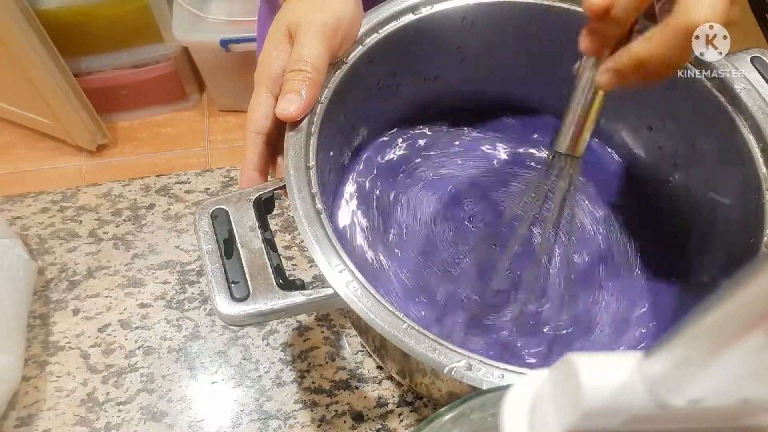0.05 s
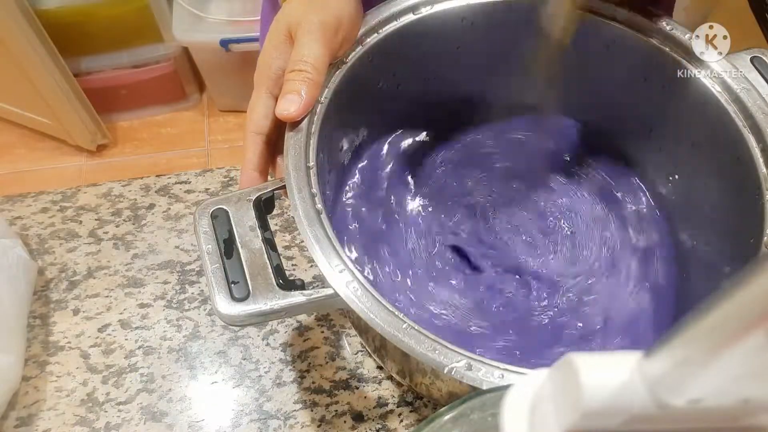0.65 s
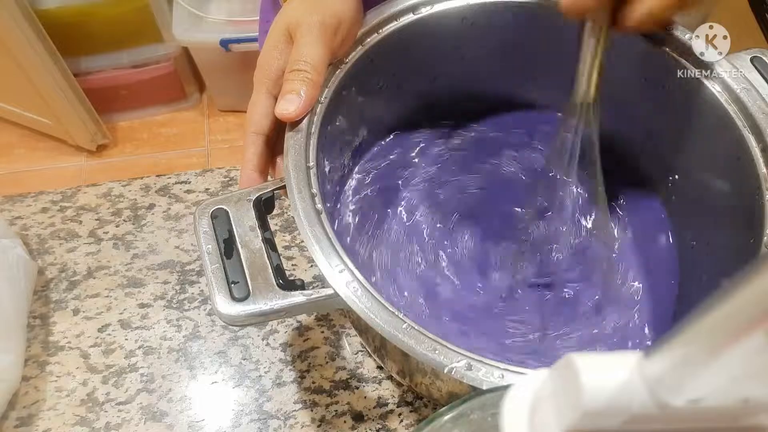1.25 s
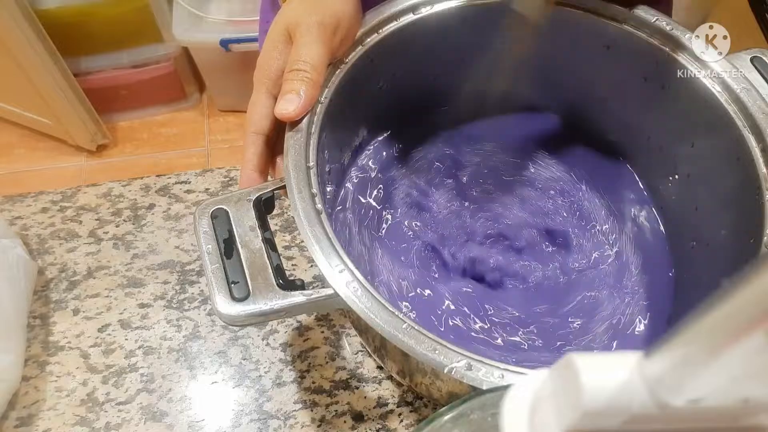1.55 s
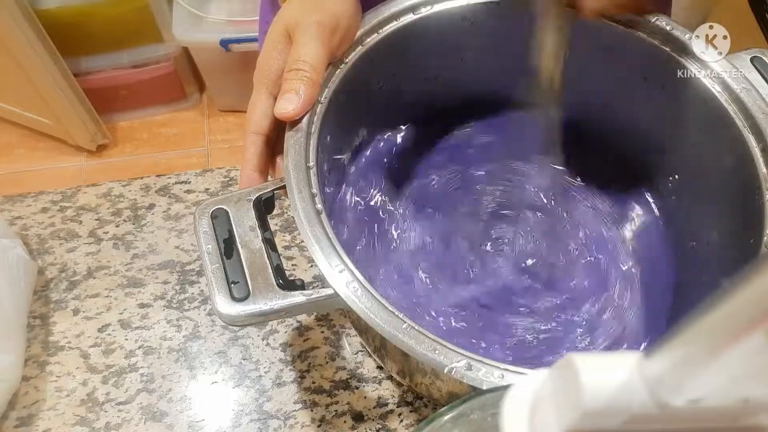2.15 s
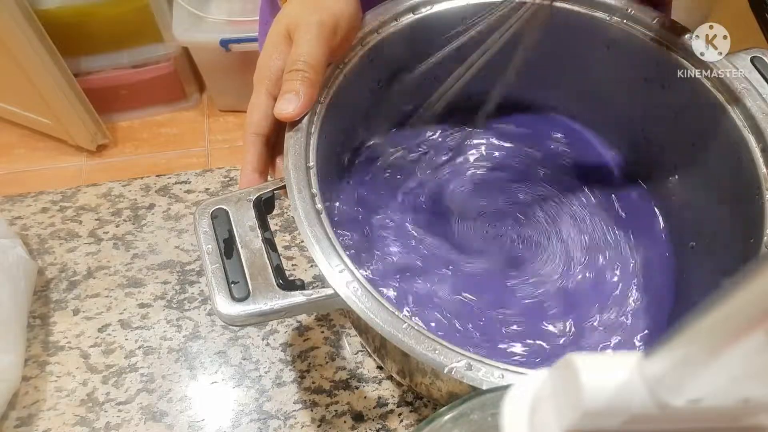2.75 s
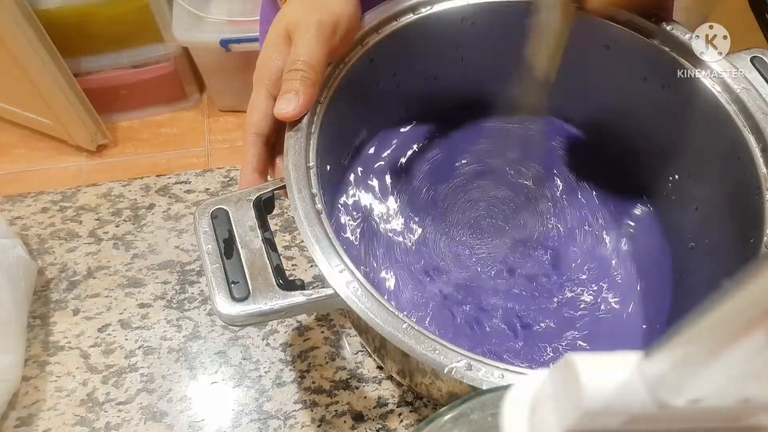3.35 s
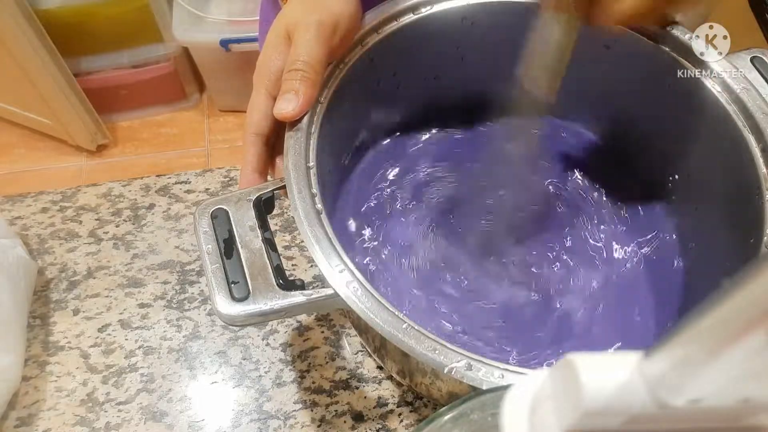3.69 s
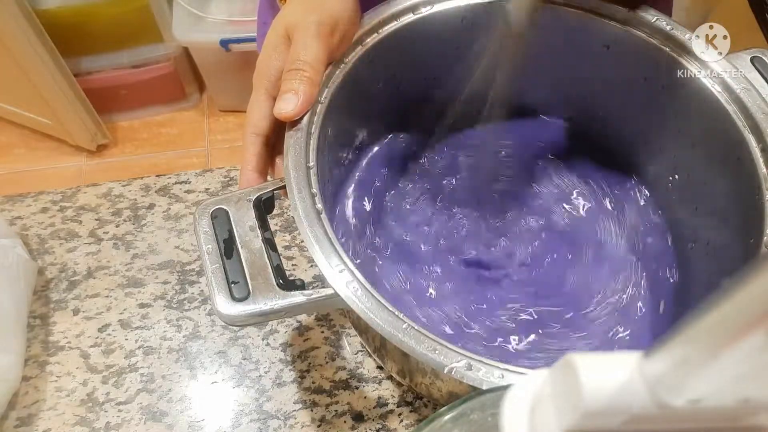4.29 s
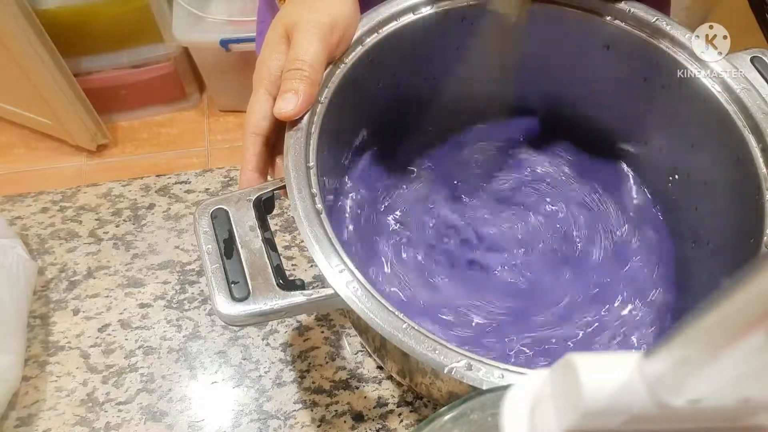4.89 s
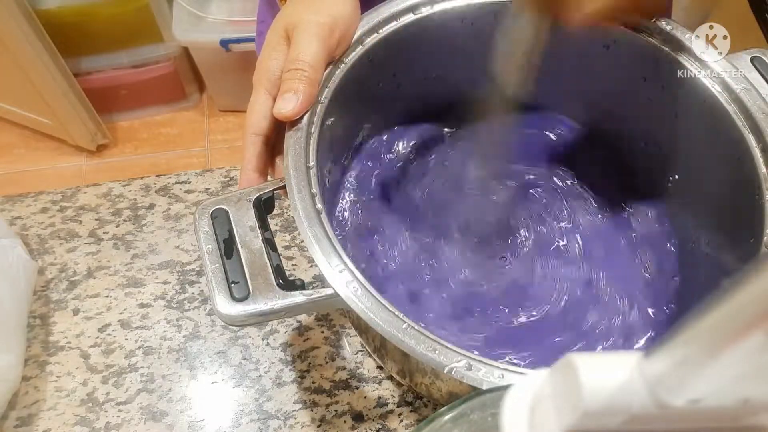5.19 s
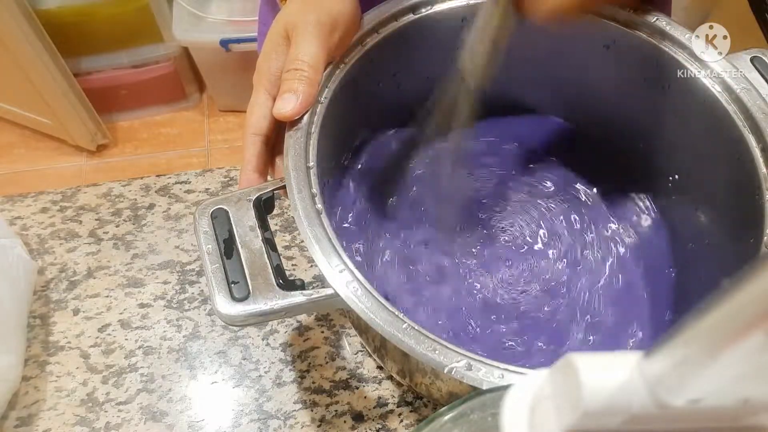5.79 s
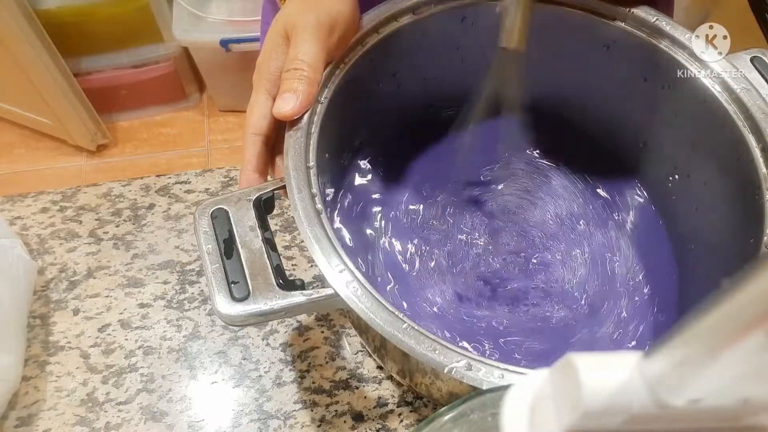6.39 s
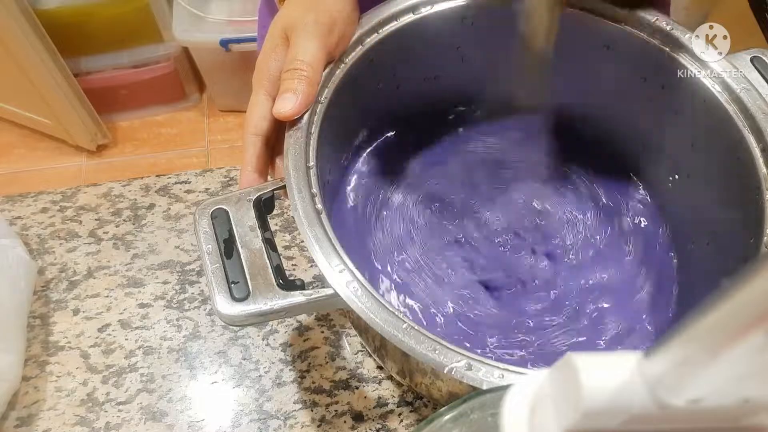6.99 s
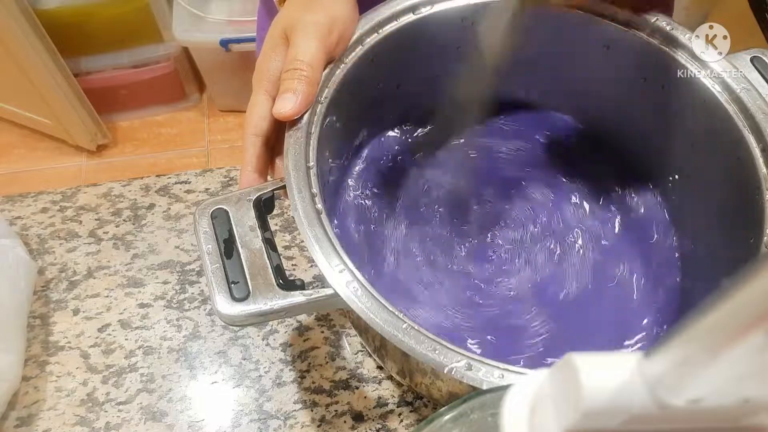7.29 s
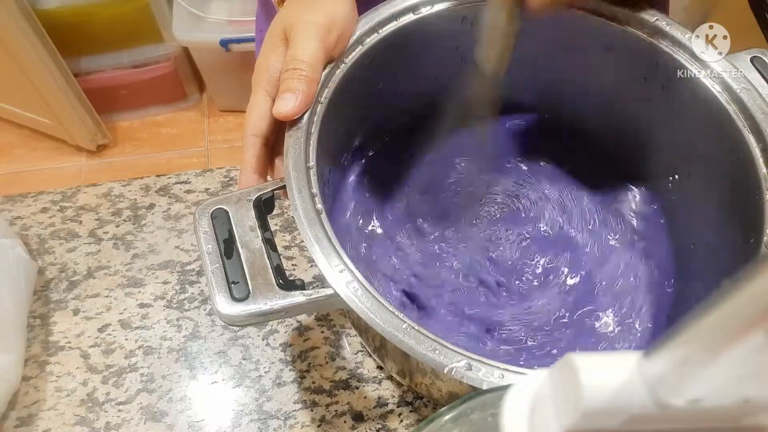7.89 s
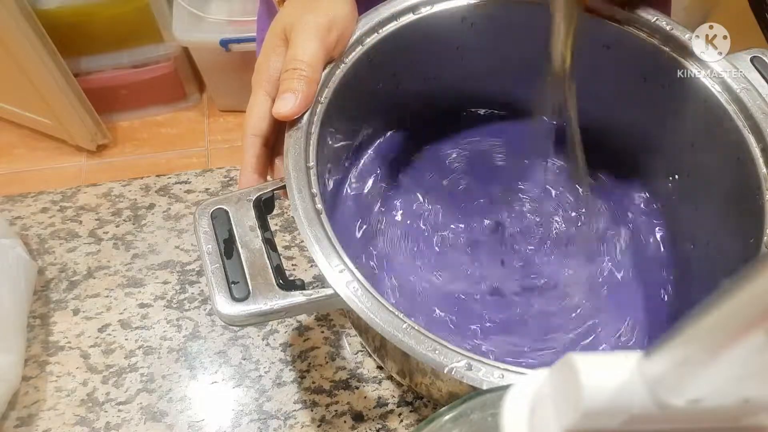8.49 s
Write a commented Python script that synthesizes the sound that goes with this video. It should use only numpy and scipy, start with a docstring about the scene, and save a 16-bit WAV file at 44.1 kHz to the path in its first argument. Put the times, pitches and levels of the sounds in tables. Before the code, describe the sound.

A wire whisk rapidly beats thin batter in a steel pot, swishing and sloshing with light metallic ticks over a faint fan hum.

```python
"""A wire whisk beats thin batter in a steel pot, about nine sweeps a second, close by.
Each sweep tears the surface into spray and froth; trapped bubbles and air pockets ring as
mass-spring oscillators, heard as plinks and gulps. The wires tick on the wall by impact and sing
on it by friction. The pot's resonances colour it all, in a small kitchen where a fan hums."""
import sys
import numpy as np
from scipy import signal
from scipy.fft import rfft, irfft, next_fast_len
from scipy.io import wavfile
from scipy.ndimage import uniform_filter1d, map_coordinates

SR = 44100
rng = np.random.default_rng(int(sys.argv[2]) if len(sys.argv) > 2 else 0)


def unload_wav(signal):
    """Save mono or channel-first audio to the path in sys.argv[1] as 16-bit WAV at rate SR, clipped to [-1, 1]."""
    wavfile.write(
        sys.argv[1],
        SR,
        np.round(np.clip(np.atleast_2d(signal).T, -1, 1) * 32767).astype(np.int16),
    )


N = 381465
T = np.arange(N) / SR
SIZE = next_fast_len(N + SR)
FREQ = np.arange(SIZE // 2 + 1) * SR / SIZE
TOP_HZ = 15500

# Turns of the whisk, each a sweep out and a sweep back: (start [s], wait until the sweep back [s],
# length of the sweep back [s], relative level out [dB], relative level back [dB])
TURNS = [(0, 0.092, 0.044, -41.5, -44.5), (0.219, 0.053, 0.12, -38.5, -34), (0.505, 0.073, 0.076, -40, -31),
         (0.721, 0.13, 0.073, -33, -31.5), (0.958, 0.097, 0.094, -31, -32.5),
         (1.175, 0.083, 0.11, -28, -31.5), (1.386, 0.079, 0.1, -26.5, -28), (1.597, 0.1, 0.082, -28, -29.5),
         (1.814, 0.051, 0.12, -24.5, -31), (2.037, 0.11, 0.084, -28.5, -35.5),
         (2.258, 0.073, 0.083, -27, -32), (2.592, 0.095, 0.084, -34, -33.5),
         (2.799, 0.087, 0.13, -41.5, -49.5), (2.986, 0.14, 0.11, -38.5, -53),
         (3.187, 0.16, 0.082, -34.5, -31), (3.439, 0.11, 0.06, -31, -29.0),
         (3.655, 0.11, 0.069, -31.5, -29.5), (3.866, 0.096, 0.089, -30, -31.0),
         (4.079, 0.093, 0.094, -28, -30), (4.287, 0.11, 0.084, -30, -30.5), (4.5, 0.1, 0.089, -28, -28.5),
         (4.716, 0.11, 0.054, -30.5, -28.5), (4.921, 0.11, 0.07, -30, -31.5),
         (5.147, 0.078, 0.097, -30.0, -33), (5.361, 0.095, 0.087, -30, -32.5),
         (5.571, 0.1, 0.06, -31.5, -30), (5.779, 0.099, 0.091, -31.5, -31.5),
         (5.994, 0.069, 0.092, -29.5, -29.5), (6.205, 0.1, 0.085, -30, -30.5),
         (6.411, 0.13, 0.097, -32, -32), (6.643, 0.11, 0.09, -35, -31), (6.862, 0.11, 0.026, -34, -28),
         (7.059, 0.064, 0.11, -27.5, -32), (7.271, 0.064, 0.083, -26.5, -30),
         (7.578, 0.093, 0.11, -32, -39), (7.759, 0.13, 0.017, -34, -31), (7.947, 0.11, 0.061, -31.5, -31.5),
         (8.153, 0.12, 0.094, -31, -32.0), (8.376, 0.11, 0.075, -29.5, -30.5),
         (8.591, 0.073, 0.063, -28.5, -30.0)]


def strokes(rise_s, fall_s, ease_db, outward_db=0):
    """Amplitude envelope of the whisk: overlapping sweeps are incoherent, so their powers add."""
    out_share = 0.63  # of the wait, filled by the sweep out
    out_ease_db, back_ease_db = 1, 2.5  # fall in level along a sweep, added to ease_db
    dip_db, dip_s, dip_lead_s = -1, 0.021, 0.021  # the whisk slows just before each new turn
    power, slowing = np.zeros((2, N))
    t = T[:SR // 2]
    for start, wait, back_s, out_db, back_db in TURNS:
        sweep_out = (start, out_share * wait, out_db + outward_db, out_ease_db)
        sweep_back = (start + wait, back_s, back_db, back_ease_db)
        for when, length, db, own_ease_db in (sweep_out, sweep_back):
            bite = np.minimum(t / rise_s, 1)
            ease = undb((ease_db + own_ease_db) * (.5 - np.minimum(t / length, 1)))
            settle = np.exp(-np.maximum(t - length, 0) / fall_s)
            add(power, when - rise_s / 2, (undb(db) * bite * ease * settle) ** 2)
    for start, *_ in TURNS[1:]:
        add(slowing, start - dip_lead_s - 2 * dip_s, np.exp(-(t / dip_s - 2) ** 2))
    return np.sqrt(power) * undb(dip_db * slowing)


def spray(flicker_db=2.5, tear_db=1.4, spatter_db=-11):
    """Shot noise: films tearing on the wires make a flickering hiss, with droplets and spatters."""
    # Bands of the hiss: (centre [Hz], relative level [dB])
    bands = [(2900, -6.5), (3700, -2), (4700, 3), (5900, -12), (7300, -10), (9800, 5.5), (13500, 3)]
    hiss = 0
    for hz, db in bands:
        bursts = 0.43 * crackle(rate=1500, spread_db=1) + stereo_crackle(rate=1500, spread_db=4)
        hiss = hiss + unit(shape(bursts, band(hz, 0.51 * hz) ** 2)) * undb(db + flicker_db * walk(130))
    droplets = bubbles(rate=330, low_hz=2688, high_hz=7835, cycles=19, glide=0.015, spread_db=3)
    spatters = unit(shape(stereo_crackle(rate=110, spread_db=1), band(7000, 9000)))
    tearing = unit(hiss * undb(tear_db * walk(70)))
    mist = undb(0.3) * tearing + undb(-7) * droplets + undb(spatter_db) * spatters
    return mist * strokes(rise_s=0.022, fall_s=0.027, ease_db=1.5)


def froth(wash_db=-6, slosh_db=-13, plip_db=-22):
    """Bubbles resonate over the shot noise of stirred liquid, louder when the whisk runs deep."""
    # Froth raised at the whisk's changing depth: (time [s], relative level [dB])
    depth = [(0, -3.5), (.27, -8), (.42, 10), (.53, -7), (.75, -0.5), (1.2, -0.5), (2.38, 3), (2.6, -3),
             (3.0, -5.5), (3.2, -1), (4.7, 1.5), (7.38, 0), (7.6, -4), (7.9, -3.5), (8.3, 1.5)]
    foam = bubbles(rate=750, low_hz=881, high_hz=3019, cycles=7.1, glide=0.043, spread_db=2.5)
    plips = bubbles(rate=12, low_hz=1280, high_hz=3030, cycles=15, glide=0.054, spread_db=0.5)
    wash = unit(shape(stereo_crackle(rate=600, spread_db=3.5), band(2230, 1200)))
    slosh = unit(shape(stereo_crackle(rate=400, spread_db=6), band(485, 870) * band(360, 1050)))
    liquid = undb(-1.98) * foam + undb(plip_db) * plips + undb(wash_db) * wash + undb(slosh_db) * slosh
    return liquid * strokes(rise_s=0.025, fall_s=0.049, ease_db=4) * undb(timeline(depth) - 2.5)


def bubbles(rate, low_hz, high_hz, cycles, glide, spread_db):
    """Bubble resonance: each is a damped oscillator of rising pitch, at random in time and place."""
    out = np.zeros((2, N))
    t = T[:1024]
    for when, pitch, rarity, sustain, left, right in rng.random((int(rate * N / SR), 6)):
        hz = low_hz * (high_hz / low_hz) ** pitch
        age = t * hz / (cycles * (.5 + sustain))  # in decay times
        ring = np.sin(2 * np.pi * hz * t * (1 + glide * np.minimum(age, 2) / 2)) * np.exp(-age)
        gain = undb(-spread_db * np.log(rarity + .02)) * np.sqrt(hz / low_hz)
        add(out, when * N / SR, np.outer([left + 0.038, right + 0.035], gain * ring))
    return unit(out)


def gulps(rise_s=0.0012, fall_s=0.00627, sag=0.52, closing=0.35, slap_db=-9, slap_s=0.0055):
    """Liquid slaps shut over an air pocket, whose resonance bends, then rises as the pocket closes."""
    # Air pockets behind the whisk: (time [s], relative level [dB], pitch [Hz],
    # fall in pitch [fraction], length [s], splash [0-1])
    pockets = [(.424, -31, 1860, 0.011, 0.0066, 0.05), (.824, -18.5, 1548, -0.016, 0.016, 0),
               (.825, -21, 1000, -0.23, 0.0037, 0.4), (1.037, -29, 694, 0.082, 0.0033, 0.95),
               (1.26, -23.5, 678, 0.12, 0.013, 0.85), (1.261, -22, 1330, 0.19, 0.0046, 1),
               (1.262, -18, 3310, -0.14, 0.0034, 0.5), (1.272, -29, 492, 0.05, 0.013, 0.2),
               (1.388, -19.5, 2820, -0.044, 0.0035, 0), (1.478, -22, 2930, -0.049, 0.0041, 0.2),
               (1.485, -21, 540, 0.21, 0.0055, 1), (1.496, -25, 938, -0.3, 0.0212, 0.1),
               (1.503, -26, 508, -0.076, .01, 0.1), (1.694, -20, 465, 0.16, 0.011, 0.4),
               (1.872, -18.5, 2506, -0.0035, 0.01, 0.7), (1.906, -20.5, 593, 0.14, 0.0055, 1),
               (1.914, -26, 1077, -.35, 0.012, 0.1), (2.11, -26, 1096, 0.036, 0.012, 0.5),
               (2.13, -27, 486, 0.074, 0.016, 0.13), (2.134, -27, 920, -.1, 0.011, 0.2),
               (2.292, -18, 2490, 0.0018, 0.0036, 0.2), (2.352, -17.5, 1457, -0.2, 0.013, 0.35),
               (3.517, -23.5, 2770, -0.043, 0.0036, 0.4), (3.96, -31.5, 670, 0.056, 0.012, 1),
               (4.163, -22.5, 1255, -0.17, 0.0089, 1), (4.17, -19, 530, 0.13, 0.0094, 0.17),
               (4.378, -24.5, 677, 0.2, 0.008, 0.45), (4.379, -16.5, 479, 0.3, 0.011, 0.2),
               (4.53, -19, 1760, 0.011, 0.0047, 0), (4.605, -22, 447, -0.086, 0.0081, 0.16),
               (4.623, -25, 998, 0.08, 0.0091, 0.04), (4.807, -19, 452, -0.05, 0.011, 0.25),
               (5.016, -28, 482, 0.015, 0.028, 0.55), (5.232, -37, 427, 0.15, 0.027, 0.45),
               (5.45, -27, 660, -0.15, 0.016, 0.2), (5.453, -27.5, 465, -0.18, 0.016, 0.25),
               (5.653, -18.5, 427, 0.16, .0041, 0.07), (5.656, -17, 1187, 0.12, 0.0064, 0.1),
               (5.874, -25, 508, -0.19, 0.0084, 0.54), (5.884, -24.5, 760, -0.24, .005, 0.6),
               (6.041, -17.5, 2170, -0.03, 0.0036, 0.83), (6.079, -21, 985, 0.39, 0.011, 0.6),
               (6.088, -21, 472, 0.13, 0.011, 0.56), (6.293, -19, 450, -0.2, 0.015, 0.3),
               (6.553, -26, 1930, -0.012, 0.0095, 0.6), (6.679, -20.5, 2350, 0.011, .004, 0.3),
               (6.731, -23.5, 469, -0.066, 0.013, 0.4), (7.148, -29, 870, 0.24, 0.005, 1),
               (7.15, -17, 421, 0.073, 0.0083, 0), (7.154, -17.5, 1520, -0.037, 0.011, 0),
               (7.36, -23.5, 1044, -0.15, 0.015, 0.7), (8.028, -33.5, 566, 0.2, 0.017, 0.9),
               (8.249, -28, 567, 0.033, 0.019, 0.83), (8.377, -35.5, 642, -0.13, 0.027, 0.8),
               (8.467, -25, 460, 0.15, 0.02, 0.35)]
    out = np.zeros(N)
    t = T[:SR // 8]
    for start, db, pitch_hz, droop, length, splash in pockets:
        length = max(length, .004)
        bend = np.interp(t, [0, length, length + 4 * fall_s], [1 + droop / 2, 1 - droop / 2, 1 + closing])
        hz = pitch_hz * bend
        wobble, spatter, slap = (low_noise(edge_hz, len(t)) for edge_hz in (130, 500, 2500))
        tone = np.sin(phase(hz) + splash * wobble)
        # a piece of the pocket splits off and chirps above it
        splinter = np.sin(phase(hz * np.interp(t, [0, length + fall_s], [1.247, 2.3])))
        swell = np.minimum(t / rise_s, 1) * np.exp(-sag * t / length - np.maximum(t - length, 0) / fall_s)
        ring = swell * (tone + splash * splinter * (0.084 + 0.84 * spatter))
        impact = splash * undb(slap_db) * slap * np.exp(-t / slap_s)
        add(out, start, undb(db) * hollow(ring + impact, pitch_hz))
    return out * undb(-0.4)


def hollow(gulp, pitch_hz, width_hz=80, ring_db=-11.5, scatter_db=2.5, delay_s=.025):
    """Cavity resonance: the pot's air answers a gulp, following its pitch within a narrow range."""
    hz = np.clip(pitch_hz, 410, 520)
    strength, lateness = rng.uniform(-1.01, 1, 2)
    answer = signal.lfilter(*signal.iirpeak(hz, hz / width_hz, fs=SR), gulp)
    delay = int(delay_s * np.exp(0.148 * lateness) * SR)
    return gulp + undb(ring_db + scatter_db * strength) * np.pad(answer, (delay, 0))[:len(gulp)]


def plinks(rise_s=0.00075, decay_s=0.0054, glide_per_s=0.94):
    """Single drops and small bubbles ring as damped oscillators that rise a little in pitch."""
    # Plinks above the froth: (time [s], relative level [dB], pitch [Hz])
    drops = [(.462, -35, 2080), (.789, -27, 3460), (.966, -28, 3080), (1.185, -26, 1390),
             (1.427, -25, 1464), (1.449, -19.5, 1808), (1.617, -23, 1390), (1.629, -20.5, 1830),
             (1.629, -19, 2500), (1.825, -19, 3720), (2.046, -25.5, 3250), (3.226, -22.5, 1505),
             (3.372, -22, 3420), (3.38, -25, 2497), (3.456, -22, 1950), (3.468, -24, 1075),
             (3.55, -23, 4600), (3.663, -22, 1290), (3.887, -23, 2153), (4.112, -23, 3730),
             (4.165, -24, 1378), (4.335, -29, 2470), (4.444, -24, 1730), (4.615, -25, 3120),
             (4.724, -26, 1370), (4.792, -26, 2420), (4.813, -25, 2067), (5.162, -19, 3080),
             (5.653, -20, 3280), (5.933, -22, 4550), (6.069, -18.5, 2180), (6.412, -24, 1050),
             (6.731, -27.5, 2430), (6.734, -24, 3010), (7.075, -19, 3850), (8.071, -23.5, 1810),
             (8.072, -32, 2460), (8.381, -22, 1410), (8.609, -26, 1420)]
    out = np.zeros(N)
    t = T[:SR // 16]
    for start, db, hz in drops:
        ring = np.sin(2 * np.pi * hz * t * (1 + glide_per_s * t / 2))
        add(out, start, undb(db) * ring * np.minimum(t / rise_s, 1) * np.exp(-t / decay_s))
    return out * undb(-0.5)


def ticks(mode_count=120, ring_s=0.0037, wire_s=0.0041, crack_s=0.0011, bounces_per_s=700):
    """Impacts excite modes: wires crack, chatter and scrape on the steel, and the wall rings on."""
    # Wires striking the pot: (time [s], relative level [dB], ring centre [Hz], ring spread [log ratio],
    # left minus right [dB], chatter decay [s], leading wire's tone [Hz], tone against ring [dB])
    strikes = [(.1027, -33.5, 3370, .45, -7, 0.0045, 3380, -6), (.34, -12, 5360, 0.48, 2, 0.009, 6400, -4),
               (.579, -16.5, 5680, 0.29, 1, 0.014, 4940, -10),
               (.7372, -23.5, 6400, 0.15, 2, 0.0036, 6560, -1),
               (1.0575, -25, 4770, 0.28, 3, 0.0042, 5080, -5),
               (1.4487, -12.5, 4660, 0.25, 3, 0.0032, 4840, -11),
               (1.815, -20, 3400, .45, 3, .005, 3700, -8), (1.868, -6.5, 5600, 0.57, 2.5, 0.007, 7170, -5),
               (2.1028, -5, 3310, 0.5, 2, 0.0079, 2610, -2.5),
               (2.3178, -6.5, 4640, 0.56, 0, 0.0044, 2730, -3),
               (2.593, -23.5, 3370, 0.41, 4, 0.005, 2630, 0),
               (2.603, -18.5, 5010, 0.57, -4, 0.0056, 3620, -4),
               (2.671, -18.5, 5080, 0.4, 0, 0.0072, 2800, -6),
               (2.7105, -13, 5050, 0.52, -0.5, .004, 3700, -13),
               (2.851, -28.5, 4500, 0.46, -3, .005, 2600, -5), (2.9008, -30, 4900, .5, -3, .004, 2840, -9),
               (3.011, -21.5, 5000, 0.36, -3, 0.003, 4850, -1.5),
               (3.0592, -22, 4950, 0.28, 0, .005, 5100, 1), (3.1954, -9.5, 3884, 0.46, 1, 0.0084, 6060, -8),
               (3.2125, -13.5, 3070, 0.42, -5, 0.0058, 3120, -6),
               (4.3114, -14.5, 2910, 0.34, -1, 0.013, 3790, -13),
               (4.5036, -11.5, 2920, .3, 2, 0.013, 3200, -6),
               (4.5835, -10, 2590, 0.48, -1, 0.0052, 2620, -7),
               (4.7227, -10.5, 2416, 0.44, 5.5, 0.0063, 2500, -7),
               (4.8994, -30, 3000, 0.54, 1, 0.0039, 2420, -6),
               (5.001, -7, 4450, .3, -0.5, 0.0075, 3400, -4.5),
               (5.219, -11, 4440, 0.35, 1.5, .0028, 3200, -8),
               (5.652, -10, 5230, 0.33, 3, 0.0055, 6280, -3.5),
               (5.8795, -20.5, 5550, 0.18, -5, 0.0025, 5110, -8),
               (6.0686, -7, 5230, 0.52, -1, 0.0058, 4440, -10),
               (6.7194, -25, 3530, 0.38, -1, .004, 2430, -9),
               (7.3347, -10.5, 4580, 0.55, 1, 0.0045, 4900, -9),
               (7.4989, -38, 3300, 0.38, -8, .005, 3320, -6),
               (7.5827, -14.5, 5610, 0.37, -6.5, 0.0068, 6115, -7),
               (7.7701, -9.5, 4040, 0.292, -1, 0.0067, 4700, -2.5),
               (7.9024, -23.5, 4500, .35, -2, .005, 4670, -5)]
    # Modes of the steel wall: (frequency [Hz], relative level [dB], decay [s])
    wall_modes = [(1607, 17.5, 0.035), (2520, 7, 0.044), (3170, 0, 0.014), (3700, 3.5, 0.015),
                  (4400, 1, 0.017), (5100, -11, 0.018), (6400, -5.5, 0.0075), (7060, 1, 0.0088),
                  (7440, -10.5, .018)]
    # the wires also brush the wall as each turn starts, with no leading tone; columns as in strikes
    brushes = [(start + .002, out_db + 7.5, 3354, .55, 4.5, 0.014, 3354, -np.inf)
               for start, _, _, out_db, _ in TURNS]
    wall_ring_db, scrape_db, crack_db = -7, -2, -7.5  # against the ring of the wires
    wall_hz, wall_db, wall_s = np.transpose(wall_modes)[:, :, None]
    bright = signal.butter(2, 7500, "high", fs=SR, output="sos")
    out = np.zeros((2, N))
    t = T[:SR // 8]
    for start, db, hz, spread, pan_db, chatter_s, wire_hz, wire_db in list(strikes) + brushes:
        chatter = np.exp(-t / chatter_s)
        modes_hz = np.minimum(hz * np.exp(spread * rng.standard_normal((mode_count, 1))), TOP_HZ)
        modes = np.sin(2 * np.pi * modes_hz * t) * np.exp(-t / ring_s)
        one_blow = (rng.standard_normal(mode_count) + rng.standard_normal((2, mode_count))) @ modes
        blows = 0.92 * (rng.random(len(t)) < bounces_per_s / SR) * rng.standard_normal(len(t)) * chatter
        blows[0] = 0.83  # the leading wire
        ring = signal.fftconvolve(one_blow, blows[None], axes=1)[:, :len(t)]
        excitation = undb(wall_db) * np.exp(-np.log(wall_hz / hz) ** 2)  # favours modes near the ring
        wall_tones = excitation * np.sin(2 * np.pi * wall_hz * t) * np.exp(-t / wall_s)
        wall = rng.standard_normal((2, len(wall_modes))) @ wall_tones
        wire = np.sin(2 * np.pi * (wire_hz * t + rng.random((2, 1)))) * np.exp(-t / wire_s)
        crack = signal.sosfilt(bright, rng.standard_normal((2, len(t))) * np.exp(-t / crack_s))
        scrape = rng.standard_normal((2, len(t))) * chatter
        tones = unit(ring) + undb(wire_db) * unit(wire) + undb(wall_ring_db) * unit(wall)
        noise = undb(scrape_db) * unit(scrape) + undb(crack_db) * unit(crack)
        add(out, start, (tones + noise) * undb(db + np.array([[pan_db], [-pan_db]]) / 2))
    return shape(out, band(7580, 11000)) * undb(-18.5)


def zing(wander=.004, flutter_db=1.0):
    """Friction drives the wires' resonances: they sing in close tones, mostly on the sweep back."""
    # How hard the wires rub the wall: (time [s], relative level [dB])
    rub = [(0, -22), (.5, -5), (.65, -3.5), (1.15, -2), (1.5, -13), (2.2, -4.5), (2.6, -13), (3.6, -8),
           (4.5, -23), (5.3, -5), (6.0, -6), (6.8, -15), (8.6, -9)]
    # Wire resonances: (frequency [Hz], width [Hz], relative level [dB])
    resonances = [(4840, 120, -3.5), (5110, 88, 1), (5284, 240, -2.5)]
    out = 0
    for hz, width_hz, db in resonances:
        tone = shape(rng.standard_normal((2, N)), band(hz, width_hz) ** 2)
        warped_time = np.cumsum(1 + wander * walk(14))  # makes the pitch wander
        wandering = np.array([map_coordinates(side, [warped_time], mode="mirror") for side in tone])
        out = out + undb(db) * unit(wandering)
    pressure = strokes(rise_s=0.038, fall_s=0.028, ease_db=-2.5, outward_db=-8)
    return unit(out) * pressure * undb(timeline(rub) + flutter_db * walk(40))


def pot(x):
    """Resonance and reflection: the pot's modes colour the sound; its walls and the kitchen echo."""
    # Air and wall resonances: (frequency [Hz], width [Hz], left level [dB], right level [dB])
    modes = [(460.4, 35, 2, 6), (704, 32, -14, -12), (785, 58, 0.5, 0), (950, 41, -21, 5.5),
             (1020, 61, -1.5, -12), (1528, 23, 7.5, 7.5), (1370.5, 27, 10, 9.5), (1398, 13, 5.5, 4),
             (1775, 60, 10.5, 11.5), (2098, 220, 7, 9.5), (2430, 96, 8, 15), (3220, 274, 2.5, 10),
             (4460, 190, -11, 7.5), (4850, 370, 7, -13), (5630, 70, -8, -5), (6550, 64, -12, -14),
             (7107, 60, -4, -13), (7343, 48, -6, -15)]
    # Response from the pot to each microphone port: (frequency [Hz], left gain [dB], right gain [dB])
    ports = [(150, -5.5, 5), (390, 3.5, 1), (623, 6, 6), (790, 2.5, 4), (2084, -3, -8.5), (3640, 4.5, -7),
             (4720, -2.5, -6), (6100, 0, 3.5), (7400, -15.5, 4.5), (8820, -29, -12.5), (9480, -23, -17.5),
             (12080, -14, -5), (16400, -10.5, -17)]
    power = 1 + sum(undb([[left], [right]]) ** 2 * abs(band(hz, width)) ** 2
                    for hz, width, left, right in modes)
    hz, *ports_db = np.transpose(ports)
    colour = np.array([causal(np.sqrt(p) * contour(hz, db)) for p, db in zip(power, ports_db)])
    walls = undb(-5) * reflections(decay_s=0.015, delay_s=0.00057, damp_hz=7000)
    kitchen = undb(-12.5) * reflections(decay_s=0.077, delay_s=0.013, damp_hz=3500)
    echoes = 1 + walls + kitchen
    # the echoes spread the sound in time but leave its broad colour alone
    flatten = np.array([causal(uniform_filter1d(abs(port) ** 2, size=1600) ** -.5) for port in echoes])
    return shape(x, colour * echoes * flatten) * undb(0.5)


def reflections(decay_s, delay_s, damp_hz):
    """Response of a diffuse field: decaying noise whose treble, above damp_hz, lasts a little longer."""
    t = T[:SR // 2]
    noise = rng.standard_normal((2, len(t)))
    dull = signal.sosfilt(signal.butter(1, damp_hz, fs=SR, output="sos"), noise)
    echoes = dull * np.exp(-t / decay_s) + (noise - dull) * np.exp(-t / (1.32 * decay_s))
    return rfft(unit(echoes * (t > delay_s)) / np.sqrt(len(t)), SIZE)


def fan(hum_hz=120.4, waver_db=2.5):
    """A fan radiates steady tones, and its rumble excites room modes over steady air; one mode near 120 Hz
    sounds as a wavering hum."""
    # Slow course of the hum: (time [s], level [dB])
    hum_levels = [(0, -37.5), (1.8, -38), (2.2, -28), (2.5, -38.5), (2.75, -29), (3.1, -62), (3.7, -31.5),
                  (4.2, -50), (4.45, -29.5), (4.9, -36.5), (6.1, -31.5), (6.6, -45), (7.0, -31),
                  (7.9, -38.5), (8.4, -42), (8.65, -40)]
    # Nearly steady tones of the fan: (frequency [Hz], level [dB])
    fan_tones = [(97, -46), (194, -44.5)]
    # Rumble in the room's resonances: (frequency [Hz], width [Hz], level [dB])
    room_modes = [(95.4, 9.5, -49.5), (114.5, 17.4, -38.5), (190, 40, -44), (256, 87, -43),
                  (330.6, 18.4, -51.5)]
    # Spectrum of the kitchen's air: (frequency [Hz], relative spectral level [dB])
    air_spectrum = [(20, -30), (50, -8.5), (80, 4), (170, 4), (300, -8.5), (500, -2), (800, -21),
                    (2000, -18), (6000, -26), (9000, -45), (15000, -59)]
    hum = unit(np.sin(phase(hum_hz + 1.88 * walk(9))))
    hum *= undb(timeline(hum_levels) + waver_db * np.tanh(walk(11)))
    tones = sum(undb(db) * unit(np.sin(phase(hz + 0.43 * walk(2.99)))) for hz, db in fan_tones)
    rumble = sum(undb(db) * unit(shape(rng.standard_normal(N), band(hz, width) ** 2))
                 for hz, width, db in room_modes)
    colour = contour(*np.transpose(air_spectrum))
    mid = shape(rng.standard_normal(N), colour)
    side = shape(rng.standard_normal(N), colour * np.minimum(0.16 + FREQ / 600, 1))  # bass is near mono
    return hum + tones + rumble + undb(-41) * unit(mid + side * np.array([[1], [-1]]))


def crackle(rate, spread_db):
    """Shot noise: on average `rate` impulses a second, most weak, a few strong."""
    sizes = undb(spread_db * np.minimum(rng.exponential(size=N), 4))
    return unit((rng.random(N) < rate / SR) * sizes * rng.choice([-1, 1], N))


def stereo_crackle(rate, spread_db):
    """Shot noise, uncorrelated between left and right."""
    return np.array([crackle(rate, spread_db) for _ in range(2)])


def low_noise(edge_hz, count):
    """Low-passed noise of rms 1."""
    return unit(signal.sosfilt(signal.butter(2, edge_hz, fs=SR, output="sos"), rng.standard_normal(count)))


def walk(rate):
    """Smooth random modulation of rms 1, with `rate` new values a second."""
    count = int(SR / rate)
    held = np.repeat(rng.standard_normal(N // count + 1), count)
    return unit(uniform_filter1d(uniform_filter1d(held, count), count)[:N])


def band(hz, width_hz):
    """Response of a second-order resonator, gain 1 at its centre."""
    return 1j * FREQ * width_hz / (hz ** 2 - FREQ ** 2 + 1j * FREQ * width_hz)


def causal(gain):
    """Minimum-phase response with this gain, from the folded cepstrum."""
    cepstrum = irfft(np.log(gain), SIZE)
    cepstrum[1:SIZE // 2] *= 2
    cepstrum[SIZE // 2 + 1:] = 0
    return np.exp(rfft(cepstrum))


def contour(hz, db):
    """Gain interpolated through (frequency [Hz], level [dB]) points."""
    return undb(np.interp(np.log(FREQ + 1), np.log(hz), db))


def timeline(points):
    """Level interpolated through (time [s], level [dB]) points."""
    return np.interp(T, *np.transpose(points))


def shape(x, response):
    """Filter by multiplying the spectrum with a response."""
    return irfft(rfft(x, SIZE) * response, SIZE)[..., :N]


def phase(hz):
    """Phase as the integral of frequency."""
    return 2 * np.pi * np.cumsum(hz) / SR


def add(track, start, sound):
    """Superpose a sound on a track at a time in seconds."""
    i = int(np.clip(start * SR, 0, N - 1))
    track[..., i:i + sound.shape[-1]] += sound[..., :N - i]


def undb(db):
    """Decibels to amplitude ratio."""
    return 10 ** (np.asarray(db) / 20)


def unit(x):
    """Scale to rms 1."""
    return x / np.sqrt(np.mean(x ** 2))


def scene():
    """Superposition: liquid and wires sound inside the pot; the fan hums behind."""
    return pot(spray() + froth() + gulps() + plinks() + ticks() + zing()) + fan()


def record(dry):
    """Soft saturation rounds the highest peaks; band limiting cuts the deepest bass and the top."""
    rounded = signal.sosfilt(signal.butter(2, 28, "high", fs=SR, output="sos"), np.tanh(dry))
    return signal.sosfilt(signal.ellip(8, .2, 70, TOP_HZ, fs=SR, output="sos"), rounded)


dry = scene()
out = record(dry)
unload_wav(out)
```